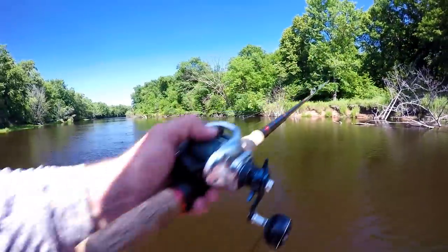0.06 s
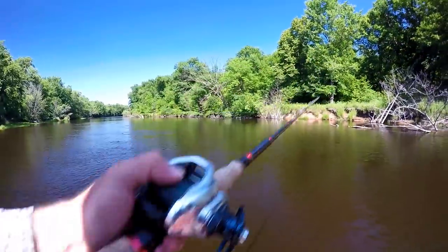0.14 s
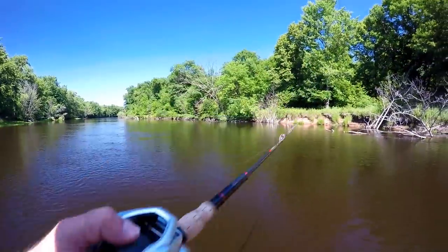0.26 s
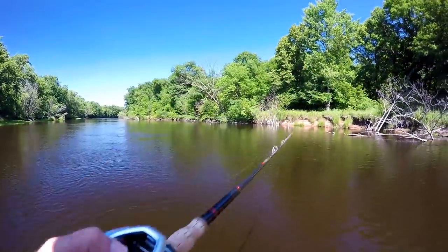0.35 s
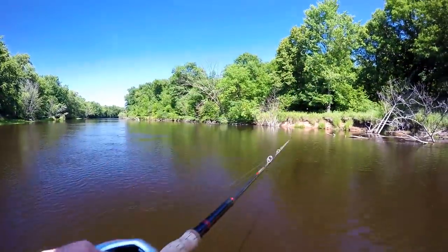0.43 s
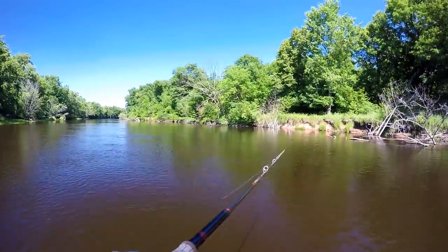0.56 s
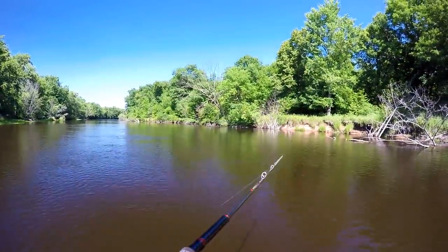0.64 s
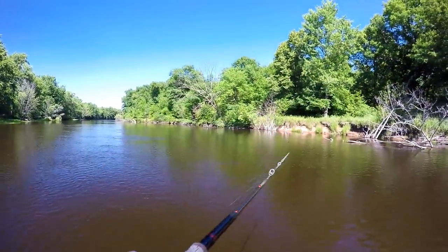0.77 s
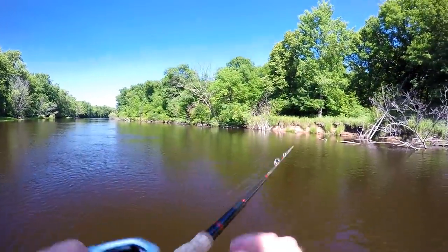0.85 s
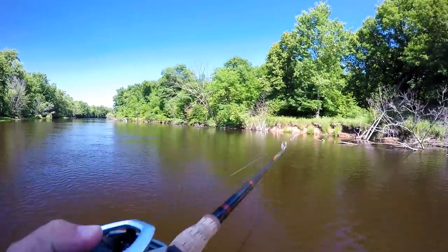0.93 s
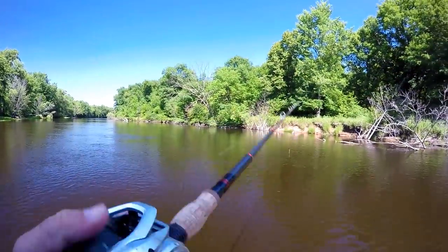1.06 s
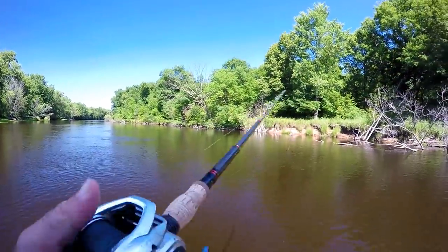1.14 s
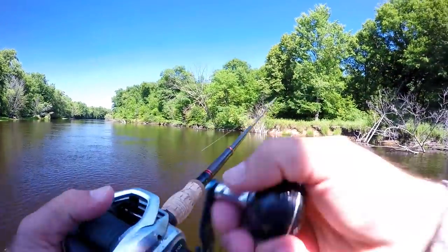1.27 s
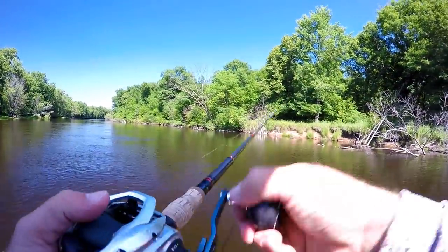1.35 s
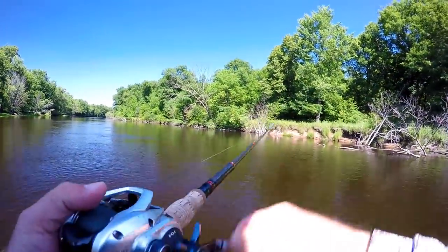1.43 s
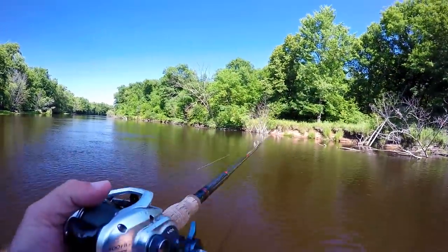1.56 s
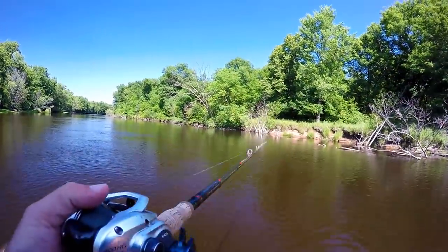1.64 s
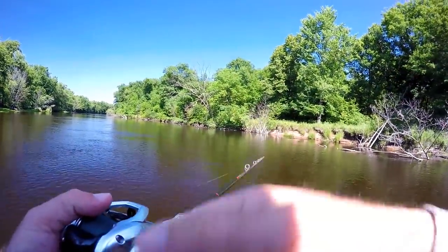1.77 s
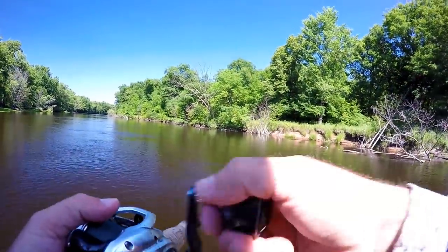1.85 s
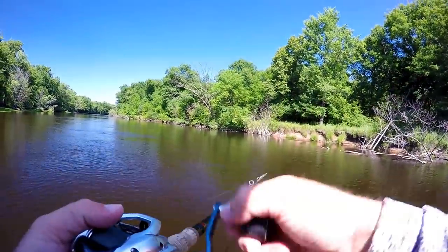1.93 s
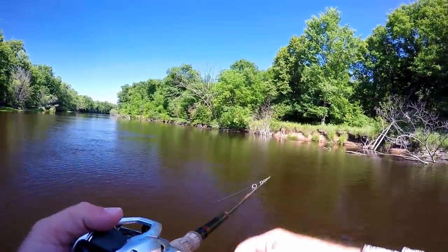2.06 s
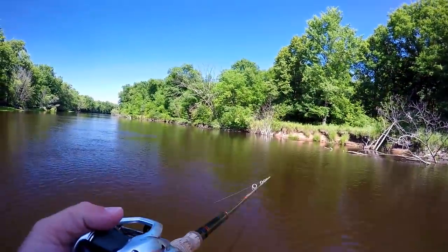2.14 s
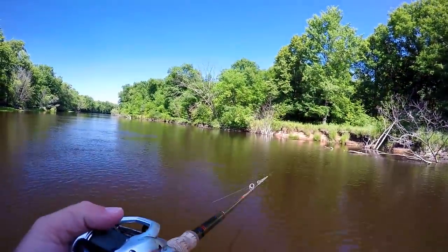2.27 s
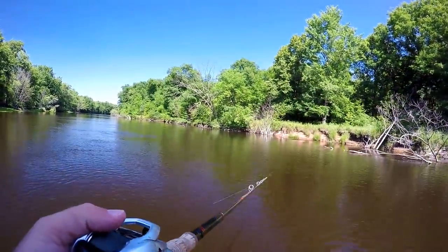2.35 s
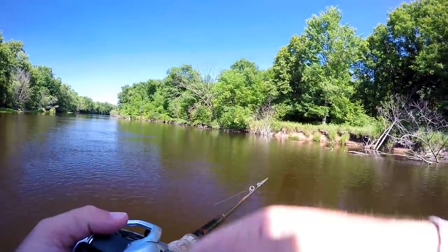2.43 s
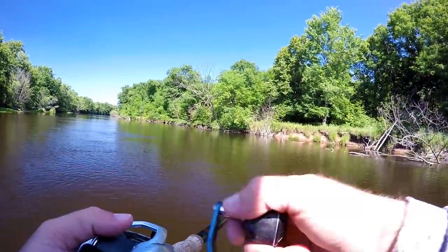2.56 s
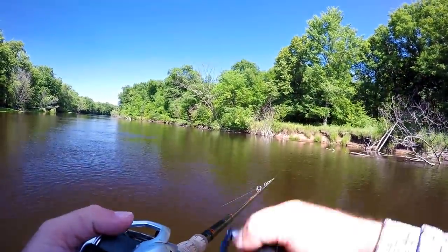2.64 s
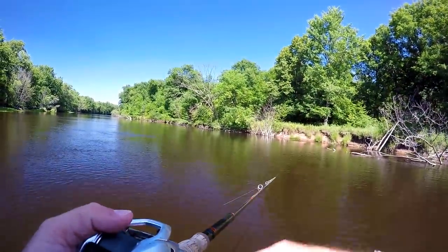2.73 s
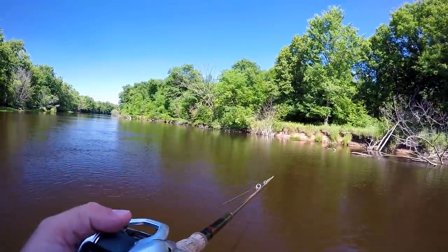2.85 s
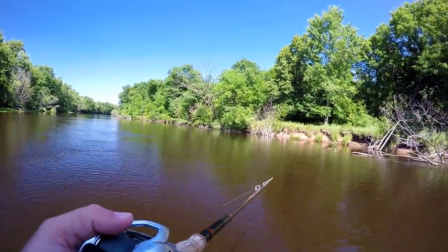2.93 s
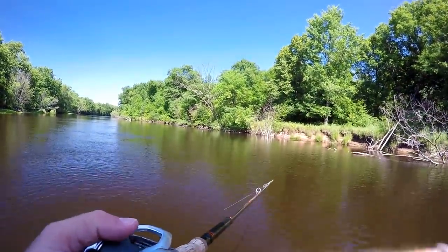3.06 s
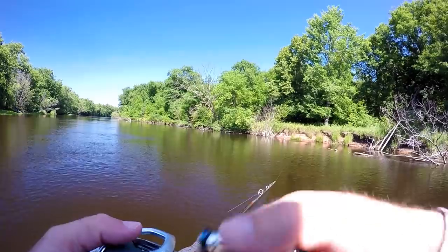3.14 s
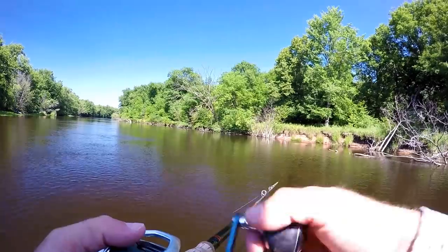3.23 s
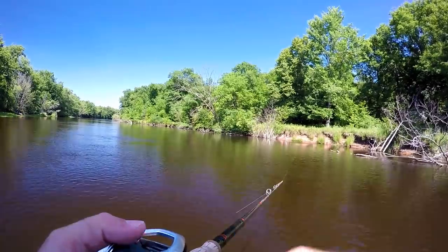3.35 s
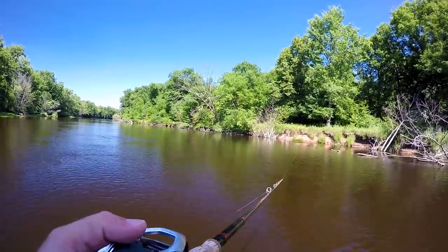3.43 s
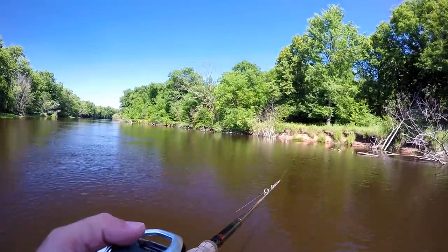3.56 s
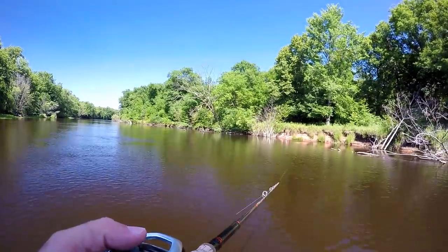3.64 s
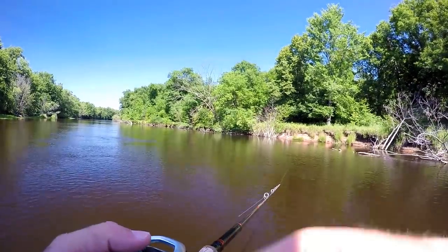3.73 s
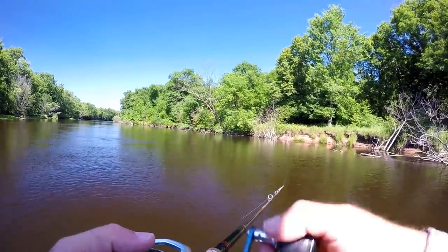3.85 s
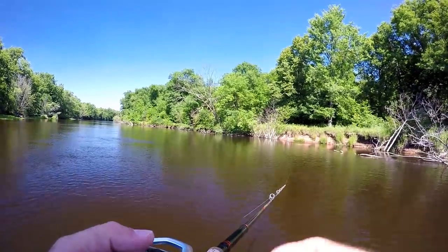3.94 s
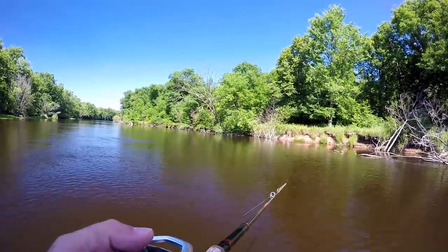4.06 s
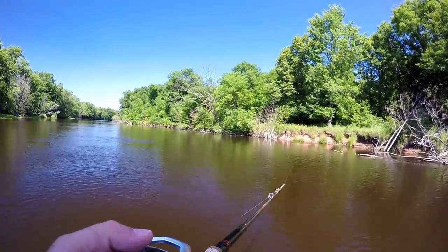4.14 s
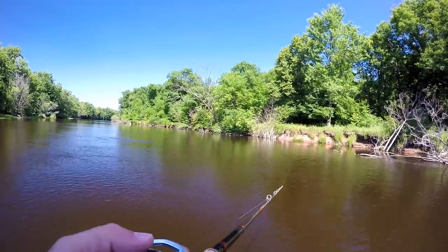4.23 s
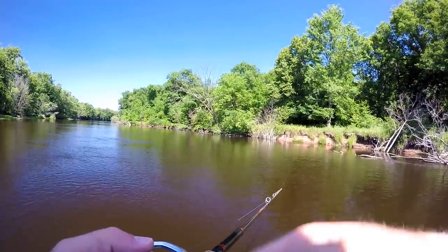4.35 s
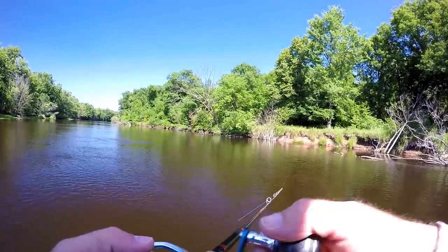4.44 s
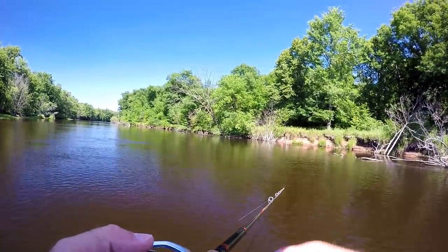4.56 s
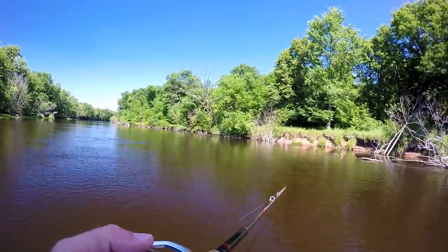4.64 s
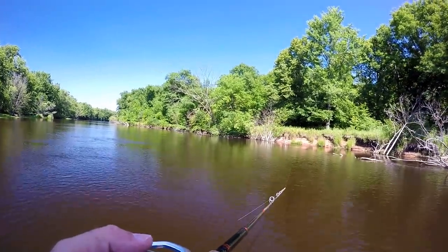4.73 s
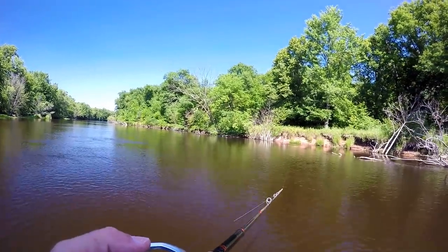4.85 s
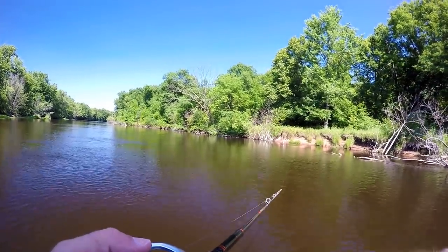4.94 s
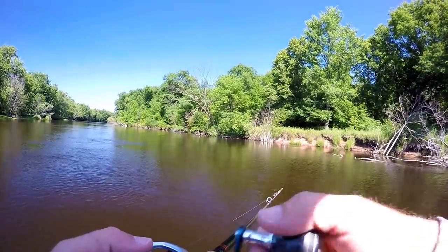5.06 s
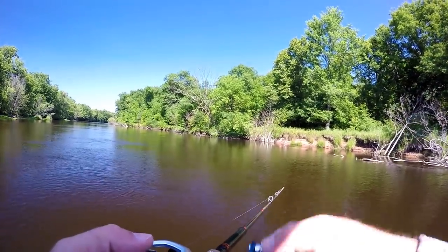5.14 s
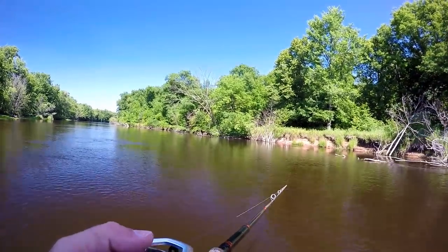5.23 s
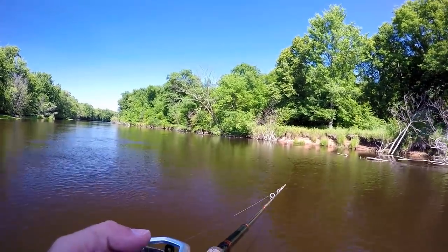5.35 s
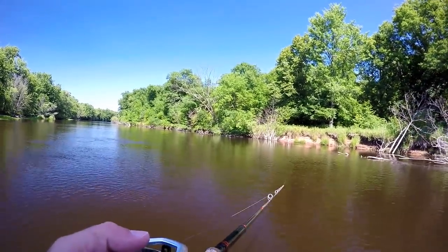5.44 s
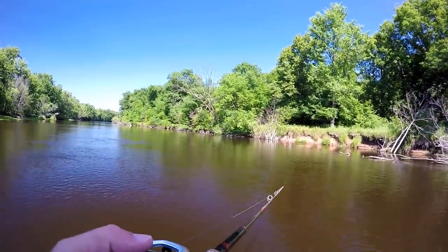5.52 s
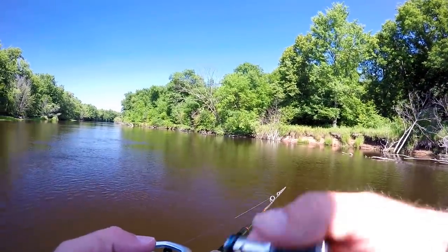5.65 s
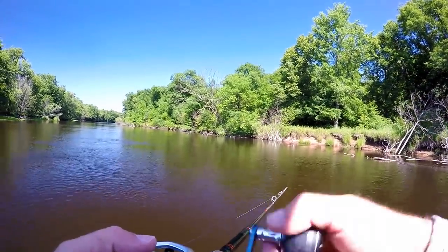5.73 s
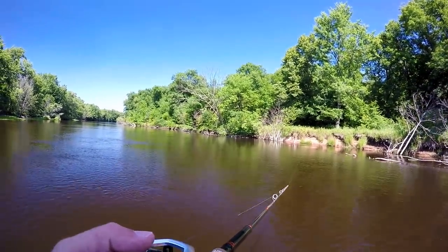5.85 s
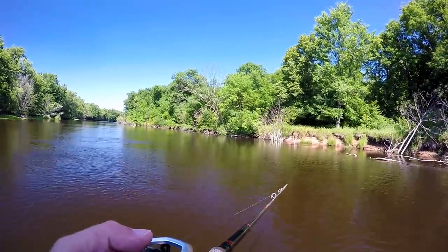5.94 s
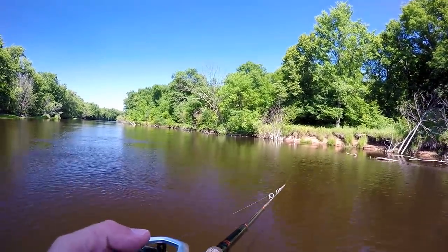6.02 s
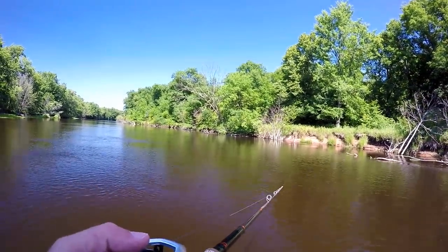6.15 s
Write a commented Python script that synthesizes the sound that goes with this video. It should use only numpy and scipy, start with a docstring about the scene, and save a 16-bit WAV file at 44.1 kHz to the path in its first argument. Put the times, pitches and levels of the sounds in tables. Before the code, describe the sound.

Close to the microphone, fishing line hisses off a whining spool, which slows and stops abruptly. The reel engages with one sharp, loud click, then its gears whirr softly as the line is wound in. Small, quick plips of water tap evenly at the boat's hull throughout. Birds chirp and whistle faintly from the riverbank, and a light breeze rumbles on the microphone.

```python
"""Line hisses and sings off a spinning spool: a cast with a baitcasting reel, close to the microphone.
The thumb stops the spool, the handle snaps the clutch in, and the gears whirr as the lure is wound back.
We are in a small boat on a river. Short rising plips, like water at the hull, come about eight times
a second; farther off, birds call from the bank, and a light breeze rumbles on the microphone."""
import sys
import numpy as np
from scipy import signal
from scipy.fft import rfft, irfft, next_fast_len
from scipy.io import wavfile

SR = 44100
rng = np.random.default_rng(int(sys.argv[2]) if len(sys.argv) > 2 else 0)


def pcm_store(signal):
    """Save signal as 16-bit PCM."""
    levels = np.round(np.clip(np.atleast_2d(signal), -1, 1) * 32767)
    wavfile.write(sys.argv[1], SR, levels.astype(np.int16).T)


N = 272979
TIME = np.arange(N) / SR


def from_db(db):
    """Decibels to gain."""
    return 10 ** (np.asarray(db) / 20)


def rms_one(x):
    """Scale to rms 1."""
    return x / np.sqrt(np.mean(x ** 2) + 1e-20)


def in_time(rows, t=TIME):
    """Each column of a curve, joined by straight lines."""
    times, *columns = np.transpose(rows)
    return [np.interp(t, times, column) for column in columns]


def add(out, start_s, sound):
    """Mix a sound in at a time."""
    at = max(0, round(start_s * SR))
    out[at:at + len(sound)] += sound[:max(0, N - at)]


def phase_of(hz):
    """Running phase of a moving frequency."""
    return 2 * np.pi * np.cumsum(hz) / SR


def swell(centre_s, length_s):
    """A smooth hump of height 1 around a moment."""
    return np.exp(-np.minimum((2 * (TIME - centre_s) / length_s) ** 2, 20))


def rise_hold_fall(attack_s, rise_db, until_s, fall_db_per_s):
    """A level in dB that climbs to 0, holds, then sinks evenly for a second."""
    return -rise_db * np.clip(1 - TIME / attack_s, 0, 1) - fall_db_per_s * np.clip(TIME - until_s, 0, 1)


def drift(rate_hz):
    """A smooth random wander; rms 1."""
    size = next_fast_len(N)
    hz = np.fft.rfftfreq(size, 1 / SR)
    return rms_one(irfft(rfft(rng.standard_normal(size)) / (1 + (hz / rate_hz) ** 2), size)[:N])


def friction(rough_db, rate_hz):
    """Rubbing noise that catches and slips."""
    return rng.standard_normal(N) * from_db(rough_db * drift(rate_hz))


def hoarse(phase, width_hz):
    """A band of noise that follows a pitch; rms 1."""
    return rms_one(drift(width_hz) * np.cos(phase) + drift(width_hz) * np.sin(phase))


def coloured(x, spectrum):
    """Give a signal a spectrum; rms 1."""
    size = next_fast_len(N)
    hz, db = np.transpose(spectrum)
    gain = from_db(np.interp(np.log(np.fft.rfftfreq(size, 1 / SR) + 1), np.log(hz), db))
    return rms_one(irfft(rfft(x, size) * gain, size)[:N])


def resonate(x, body):
    """Parallel resonances with alternating signs; rms 1."""
    out = 0
    for k, (hz, width_hz, db) in enumerate(body):
        radius = np.exp(-np.pi * width_hz / SR)
        poles = [1, -2 * radius * np.cos(2 * np.pi * hz / SR), radius ** 2]
        out += (-1) ** k * from_db(db) * (1 - radius ** 2) * signal.lfilter([1, 0, -1], poles, x)
    return rms_one(out)


def ring(clicks, hz, t60_s):
    """A unit click sets a sine of height 1 ringing."""
    radius, angle = from_db(-60 / (t60_s * SR)), 2 * np.pi * hz / SR
    poles = [1, -2 * radius * np.cos(angle), radius ** 2]
    return signal.lfilter([0, np.sin(angle)], poles, clicks + 1e-18)


def soften(x, hz, order=2):
    """Low-pass filter."""
    return signal.sosfilt(signal.butter(order, hz, fs=SR, output="sos"), x)


def scattered(x, decay_s):
    """A diffuse tail of many small reflections, about as strong as the sound itself."""
    t = TIME[:SR // 2]
    tail = rng.standard_normal(len(t)) * np.exp(-t / decay_s)
    return signal.fftconvolve(x, tail / np.linalg.norm(tail))[:N]


# River and leaves, all around the boat: freq_hz, density_db
RIVER_SPECTRUM = [(60, -2.5), (150, 2), (240, 1.5), (330, -0.5), (700, -1), (1200, -6.5), (2500, -11),
                  (5000, -15), (8000, -25.5), (15500, -28.5)]


def river(level_db=-56.5):
    """Water and leaves blend into an even wash."""
    return from_db(level_db) * coloured(rng.standard_normal(N), RIVER_SPECTRUM)


# Breeze, right on the microphone: freq_hz, density_db
BREEZE_SPECTRUM = [(15, -2.5), (32, 4), (60, -4.5), (100, -10), (160, -31.5), (400, -40.5), (1000, -57)]
# Its gusts: centre_s, boost_db, length_s
BREEZE_GUSTS = [(.2, 3, 0.2), (0.991, 6, .1), (1.272, 8.5, 0.21), (1.757, 7, .2), (2.996, 4, 0.87),
                (3.729, 5, 0.1), (5.05, 4.5, 0.24)]


def breeze(start_db=-50, fall_db_per_s=1.15, waver_db=1.3):
    """Moving air rumbles on the microphone, gusting as it slowly dies down."""
    gust_db = sum(db * swell(s, length_s) for s, db, length_s in BREEZE_GUSTS)
    level_db = start_db - fall_db_per_s * TIME + gust_db - waver_db * drift(5)
    return from_db(level_db) * coloured(rng.standard_normal(N), BREEZE_SPECTRUM)


# Whistles, off on the bank: start_s, length_s, start_hz, middle_hz, end_hz, level_db
BANK_WHISTLES = [(1.3, 0.087, 6660, 6400, 5840, -70), (1.468, 0.071, 6760, 6320, 6050, -66),
                 (1.527, 0.029, 6100, 5570, 5100, -68), (1.632, 0.11, 7300, 7300, 7550, -76),
                 (1.814, 0.042, 5020, 6040, 6620, -64), (2.962, 0.13, 3290, 2750, 3700, -70),
                 (3.992, 0.056, 2790, 3200, 3740, -62.5), (4.114, 0.036, 3870, 3080, 2500, -63),
                 (5.181, 0.083, 2880, 3380, 2710, -67), (5.236, 0.076, 3900, 3640, 3370, -65.5),
                 (6.03, .06, 2900, 3490, 4300, -72)]


def bird_whistles(flicker_db=5.5, echo_db=0.5):
    """Slurred, flickering notes, scattered by the trees."""
    notes = np.zeros(N)
    for s, length_s, start_hz, middle_hz, end_hz, db in BANK_WHISTLES:
        progress = np.linspace(0, 1, int(length_s * SR))
        glide_hz = np.interp(progress, [0, .5, 1], [start_hz, middle_hz, end_hz])
        arch = np.sqrt(4 * progress * (1 - progress))
        add(notes, s, from_db(db) * arch * np.sin(phase_of(glide_hz)))
    direct = notes * from_db(flicker_db * drift(90))
    return direct + from_db(echo_db) * scattered(notes, decay_s=.05)


# Sharp chips from a bird in the bankside trees: start_s, level_db
BANK_CHIPS = [(1.177, -46.5), (2.086, -47), (2.731, -48), (3.345, -47), (4.178, -50), (4.906, -48),
              (5.544, -47)]
# One chip: elapsed_s, pitch_hz, gain_db
CHIP_SHAPE = [(0, 8940, -25), (.006, 8020, -10), (.009, 7000, -14), (.012, 6120, -19), (.015, 4900, -3),
              (.018, 4400, -10), (.023, 4030, -12)]


def bird_chips(rasp_depth_hz=350, echo_db=-2.5):
    """Short raspy chips fall through an octave and linger in the trees."""
    chips, t = np.zeros(N), TIME[:SR // 40]
    hz, shape_db = in_time(CHIP_SHAPE, t)
    rasp_hz = rasp_depth_hz * drift(430)
    for s, db in BANK_CHIPS:
        phase = phase_of(hz + np.interp(s + t, TIME, rasp_hz))
        add(chips, s, from_db(db + shape_db) * np.sin(phase))
    return chips + from_db(echo_db) * scattered(chips, decay_s=.061)


# Bumps on the hull, near the microphone: start_s, level_db, pitch_hz, length_s
HULL_BUMPS = [(.642, -42.5, 241.6, 0.024), (0.661, -40.5, 101, 0.05), (.668, -46.5, 202, .05),
              (0.9, -47.5, 400, 0.029), (.97, -37.5, 131.7, 0.021), (1.324, -44, 224, 0.023),
              (2.093, -49.5, 190, 0.029)]


def hull_bumps():
    """Each soft bump is a few cycles of a low tone."""
    out = np.zeros(N)
    for s, db, hz, length_s in HULL_BUMPS:
        progress = np.linspace(0, 1, int(length_s * SR))
        tone = np.sin(2 * np.pi * hz * length_s * progress)
        add(out, s, from_db(db) * np.sin(np.pi * progress) * tone)
    return out


# The stronger plips, nearby at the hull: start_s, level_db
STRONG_PLIPS = [(0.086, -38.5), (.21, -36), (.328, -39), (.445, -36.5), (.678, -39.5), (0.803, -39),
                (.925, -38.5), (1.053, -39), (1.167, -37.5), (1.582, -40.5), (1.709, -39), (2.106, -42),
                (2.512, -44), (2.644, -37.5), (2.774, -42.5), (2.897, -43), (3.026, -41.5), (3.296, -36.5),
                (3.417, -42), (3.818, -36.5), (3.939, -35), (4.059, -37), (4.187, -42), (4.318, -40),
                (4.442, -35), (4.559, -36.5), (4.679, -38.5), (4.802, -40.5), (4.929, -41), (5.051, -36.5),
                (5.175, -38.5), (5.303, -39), (5.437, -41), (5.567, -33.5), (5.692, -37.5), (5.819, -40.5),
                (5.953, -41.5), (6.087, -41)]
# One plip: elapsed_s, pitch_hz, gain_db
PLIP_SHAPE = [(0, 195, -2), (.0035, 248, -9.5), (.0051, 423, 1.5), (.0066, 710, -0.5), (.0094, 870, 0),
              (.0117, 985, -9.5), (.0156, 1160, -4.5), (.0195, 1240, -15), (.028, 1270, -23)]


def hull_plips(every_s=.131, weak_db=-47.5, pitch_spread=.0342, length_spread=.049):
    """Each plip starts as a low gulp and shoots up in pitch as it fades; the boat dulls it."""
    beat = list(STRONG_PLIPS)
    for (start_s, _), (end_s, _) in zip(STRONG_PLIPS, STRONG_PLIPS[1:]):    # weak plips fill the gaps
        steps = round((end_s - start_s) / every_s)
        beat += [(s, weak_db) for s in np.linspace(start_s, end_s, steps + 1)[1:-1]]
    out, t = np.zeros(N), TIME[:SR // 25]
    wobble_db, pitch_waver = 2.0 * drift(170), .037 * drift(130)
    for (s, db), (higher, longer) in zip(beat, rng.standard_normal((len(beat), 2))):
        hz, shape_db = in_time(PLIP_SHAPE, t / np.exp(length_spread * longer))
        uneven_db = np.interp(s + t, TIME, wobble_db)
        bend = 1 + pitch_spread * higher + np.interp(s + t, TIME, pitch_waver)
        add(out, s, from_db(db + shape_db + uneven_db) * np.sin(phase_of(hz * bend)))
    return soften(out, hz=1250, order=6)


# The hand brushing the grip, close up: peak_s, level_db, decay_s
GRIP_BRUSHES = [(.882, -55, 0.018), (.938, -54.5, 0.019), (.972, -53, 0.0067), (1.055, -59, .04),
                (1.13, -69, .5)]
# Handling noise on the reel, both rustle and rattle: freq_hz, density_db
HANDLING_SPECTRUM = [(120, -13.5), (300, -5), (1000, -6.5), (1600, -11.5), (2600, -11), (4500, -9),
                     (6300, -1.5), (8000, -12.5), (13000, -9), (16000, -7.5)]


def grip(attack_s=.008):
    """Skin and sleeve rustle on the reel as the hand goes to the handle."""
    pressure = np.zeros(N)
    for s, db, decay_s in GRIP_BRUSHES:
        rise = np.clip(1 + (TIME - s) / attack_s, 0, 1)
        fall = np.exp(-np.clip((TIME - s) / decay_s, 0, 20))
        pressure += from_db(db) * rise * fall
    return pressure * coloured(friction(rough_db=3.0, rate_hz=110), HANDLING_SPECTRUM)


# Clutch and gear contacts, close up: start_s, strength_db, brightness_hz, rattle_t60_s
CLUTCH_CONTACTS = [(.7475, -30.5, 1480, 0.064), (.8515, -40.5, 7000, 0.0067), (.8675, -40.5, 11500, 0.0099),
                   (.9745, -32, 1400, 0.06), (.9900, -36.5, 7900, 0.0083), (1.0126, -15, 12200, 0.012),
                   (1.0162, -1, 8200, 0.0068), (1.0200, -15, 13000, 0.016), (1.0229, -12.5, 2500, 0.018),
                   (1.0312, -31.5, 6000, .012), (1.033, -17.5, 1200, 0.0076), (2.3981, -47, 9000, 0.0045),
                   (3.539, -44, 2870, 0.0072), (3.9415, -38.5, 2440, .005), (4.676, -39, 2520, 0.0044),
                   (4.797, -43, 2500, 0.0064)]
# Reel and rod when struck: pitch_hz, gain_db, t60_s
STRUCK_MODES = [(403, -23.5, 0.081), (663, -31.5, 0.033), (744, -37, 0.11), (899, -23, 0.067),
                (1230, -24, 0.02), (1540, -29.5, 0.06), (1915, -30.5, 0.042), (2300, -15.5, .014),
                (2580, -16.5, .025), (2775, -17.5, .025), (3974, -10, 0.01), (4857, -8.5, 0.009),
                (5970, -17, 0.0099), (6250, -16.5, .018), (10730, -14, 0.02), (12620, -18, 0.028)]


def clutch(ring_gain_db=3.5, rattle_gain_db=2.5):
    """Each contact is a blow that rings the reel, with a brief rattle of metal parts."""
    blows, rattles = np.zeros(N), np.zeros(N)
    t = TIME[:SR // 16]
    click = 1.0 * (t == 0)
    grain = coloured(rng.standard_normal(N), HANDLING_SPECTRUM)
    for k, (s, db, bright_hz, t60_s) in enumerate(CLUTCH_CONTACTS):
        burst = grain[k * len(t):(k + 1) * len(t)] * from_db(-60 * t / t60_s)
        add(blows, s, from_db(db) * soften(click, bright_hz))
        add(rattles, s, from_db(db) * soften(burst, bright_hz))
    body = sum((-1) ** k * from_db(db) * ring(blows, hz, t60_s)
               for k, (hz, db, t60_s) in enumerate(STRUCK_MODES))
    return from_db(ring_gain_db) * body + from_db(rattle_gain_db) * rattles


# Gear whirr, close up, as the slack comes in and the lure pulls: time_s, level_db
WHIRR_LEVEL = [(.88, -67), (1.15, -52), (1.55, -57), (1.95, -59), (3.1, -57), (4.3, -54.5), (6.0, -55.5),
               (6.19, -59.5)]
# The reel body around the gears: centre_hz, width_hz, gain_db
GEAR_RESONANCES = [(190, 9.5, -6.5), (400, 96, -1), (591, 50, 4), (885, 58, -2), (1085, 87, 2.5),
                   (1363, 22, 1.5), (1494, 94.6, 0), (1700, 50, 3), (1858, 76, 0), (2130, 210, -5.5),
                   (2450, 190, -11.5), (3360, 110, -14.5)]
# The gears whining as they take up the slack: centre_s, level_db, length_s
GEAR_WHINES = [(1.285, -59.5, 0.052), (1.49, -58, 0.15)]
# Line winding onto the spool: freq_hz, density_db
RUB_SPECTRUM = [(1800, -2.5), (2500, 4), (2900, -4.5), (3300, 6), (3700, 1.5), (4450, 8.5), (4950, 1.5),
                (5500, -50.5), (8000, -7), (15000, -38)]


def retrieve(start_s=.855, attack_s=.07, first_push_s=1.54, handle_turn_s=.62,
             tooth_hz=112, whine_hz=1545):
    """Gear teeth grind and wet line rubs onto the spool; both swell with each push of the handle."""
    push = np.cos(2 * np.pi * (TIME - first_push_s) / handle_turn_s)
    gear_db = in_time(WHIRR_LEVEL)[0] + 1.2 * push
    wet_db = 4 * np.clip((1.58 - TIME) / .44, 0, 1)    # the first line to come in rubs louder
    rub_db = -66.5 + 1.1 * push + wet_db
    teeth = 1 + .5 * np.cos(phase_of(tooth_hz * (1 + .07 * drift(3.05))))
    gears = resonate(teeth * friction(rough_db=1.74, rate_hz=110), GEAR_RESONANCES)
    rub = coloured(teeth * friction(rough_db=2.6, rate_hz=200), RUB_SPECTRUM)
    whine_gain = sum(from_db(db) * swell(s, length_s) for s, db, length_s in GEAR_WHINES)
    whine = whine_gain * hoarse(2 * np.pi * whine_hz * TIME, width_hz=45)
    winding = np.clip((TIME - start_s) / attack_s, 0, 1)
    return winding * (from_db(gear_db) * gears + from_db(rub_db) * rub + whine)


# The thumb on the spool, close up: time_s, pitch_hz, level_db
THUMB_RUB = [(.69, 8980, -100), (.715, 8010, -59), (.733, 6460, -52), (.746, 4240, -56), (.76, 2430, -100)]


def thumb():
    """The rub under the thumb dives in pitch as the spool stops."""
    hz, db = in_time(THUMB_RUB)
    return from_db(db) * hoarse(phase_of(hz), width_hz=1200)


# The spool's hoarse song, close up: time_s, pitch_hz, level_db
SPOOL_SONG = [(0, 2333, -59), (.07, 2280, -61), (.14, 2178, -59), (.36, 2195, -57), (.44, 2140, -60),
              (.48, 1800, -62), (.6, 1700, -57.5), (.69, 1604, -65), (.725, 1330, -57), (.755, 724, -62)]
# Its partials, lowest first: fast_spool_db, slow_spool_db
SONG_PARTIALS = [(-19, -10), (2.5, -2), (2, -5), (-24, -6), (-21, -15)]


def spool_song():
    """The spool's rub has broad partials that sink as it slows and dive under the thumb."""
    hz, db = in_time(SPOOL_SONG)
    phase = phase_of(hz)
    slowness = np.clip((2150 - hz) / 400, 0, 1)
    partials = np.zeros(N)
    for k, (fast_db, slow_db) in enumerate(SONG_PARTIALS, 1):
        gain = from_db(fast_db + slowness * (slow_db - fast_db))
        partials += gain * hoarse(k * phase, width_hz=150 * np.sqrt(k))
    return from_db(db) * partials


# The reel frame under the spool: centre_hz, width_hz, gain_db
FRAME_RESONANCES = [(460, 133, 0), (760, 125, -5), (902, 98, 1.5), (1200, 410, -7), (1700, 390, -8.5)]
# Spool whine at 2, 4, 6 and 8 times the turn rate: gain_db
SPOOL_HARMONICS = [-11.5, -9.5, -13, -17]


def spool_rumble(turn_phase, flutter, flow_db, level_db=-44, follows_flow=.81):
    """The spinning spool whines and shakes the frame."""
    rumble = resonate(flutter * friction(rough_db=2.0, rate_hz=55), FRAME_RESONANCES)
    whine = sum(from_db(db) * np.sin(2 * k * turn_phase) * from_db(3.0 * drift(7.5))
                for k, db in enumerate(SPOOL_HARMONICS, 1))
    return from_db(level_db + follows_flow * flow_db) * (rumble + whine)


# Line in the level-wind eye, close up: centre_hz, width_hz, gain_db
EYE_RESONANCES = [(9350, 600, -2.5), (10900, 690, 0), (13000, 1300, 2), (14600, 790, -4)]


def line_sizzle(flutter, level_db=-56, waver_db=5):
    """Line slides through the eye with a thin sizzle; each resonance comes and goes."""
    shape_db = rise_hold_fall(attack_s=.066, rise_db=16, until_s=.58, fall_db_per_s=30)
    sliding = flutter * friction(rough_db=.8, rate_hz=200)
    sizzle = sum((-1) ** k * from_db(db + waver_db * drift(5.5)) * resonate(sliding, [(hz, width_hz, 0)])
                 for k, (hz, width_hz, db) in enumerate(EYE_RESONANCES))
    return from_db(level_db + shape_db) * rms_one(sizzle)


# Line on the guides, within a rod's length: freq_hz, density_db
HISS_SPECTRUM = [(1500, -8), (2700, -4.5), (3250, -8), (4200, 4.5), (5400, -5), (6500, 5.5), (8200, -2),
                 (9300, -17.5), (12000, -15)]
# Loose coils rushing off the spool: centre_s, boost_db, length_s
COIL_SURGES = [(0.142, 4.5, 0.048), (0.229, 5.5, 0.017), (0.353, 7, 0.027), (0.52, 5, 0.098)]


def line_hiss(flutter, flow_db, level_db=-45):
    """Line rubs through the guides, louder as loose coils rush out."""
    surge_db = sum(db * swell(s, length_s) for s, db, length_s in COIL_SURGES)
    hiss = coloured(flutter * friction(rough_db=3.0, rate_hz=370), HISS_SPECTRUM)
    return from_db(level_db + flow_db + surge_db) * hiss


# The spool during the cast, close to the microphone: time_s, turn_rate_hz
SPOOL_SPEED = [(0, 103), (.08, 118), (.17, 121), (.28, 110), (.4, 88), (.52, 83), (.76, 40)]


def cast(stop_s=.757, braking_s=.017):
    """Line flutters off the spool once a turn; its flow builds, holds as the lure flies, then dies."""
    flow_db = rise_hold_fall(attack_s=.16, rise_db=12, until_s=.34, fall_db_per_s=54)
    turn_phase = phase_of(in_time(SPOOL_SPEED)[0] * (1 + .0054 * drift(34)))
    looseness = np.interp(TIME, [.3, .45, .6], [.22, .45, .28])    # the coils loosen as the lure slows
    flutter = 1 + looseness * np.cos(turn_phase)
    line = line_hiss(flutter, flow_db) + line_sizzle(flutter)
    spool = spool_rumble(turn_phase, flutter, flow_db) + spool_song()
    spinning = np.clip((stop_s - TIME) / braking_s, 0, 1)
    return spinning * (line + spool)


def scene():
    """One microphone in the boat: the reel close by, the hull below, the bank farther off."""
    reel = cast() + thumb() + grip() + clutch() + retrieve()
    hull = hull_plips() + hull_bumps()
    bank = bird_chips() + bird_whistles()
    return (reel + hull + bank + breeze() + river())[None]


def record(dry, ceiling=.9, cutoff_hz=15400):
    """Soft saturation rounds off the clutch's peak, and a steep low-pass cuts the top."""
    rounded = ceiling * np.tanh(dry / ceiling)
    return signal.sosfilt(signal.ellip(12, .1, 80, cutoff_hz, fs=SR, output="sos"), rounded)


dry = scene()
out = record(dry)
pcm_store(out)
```